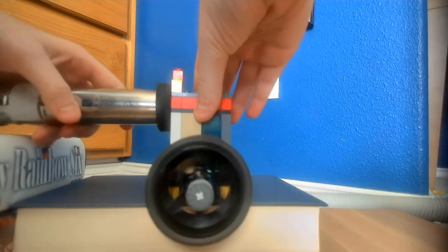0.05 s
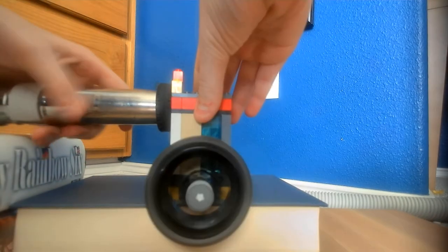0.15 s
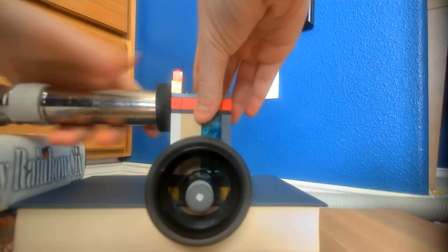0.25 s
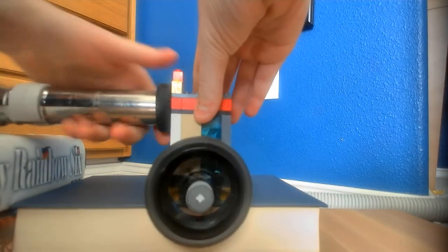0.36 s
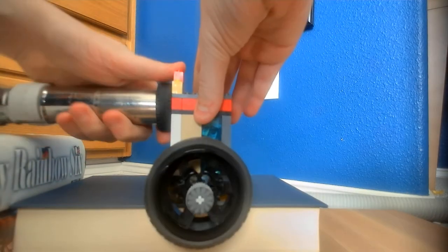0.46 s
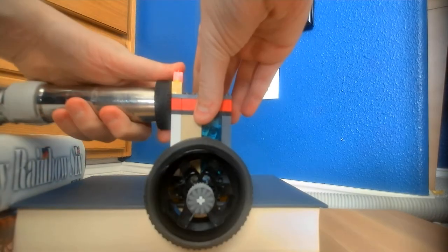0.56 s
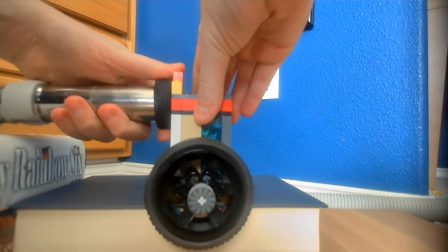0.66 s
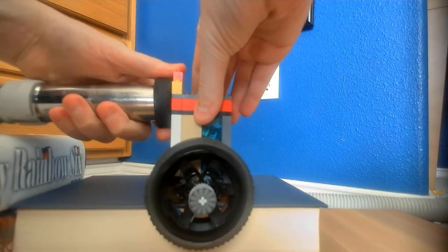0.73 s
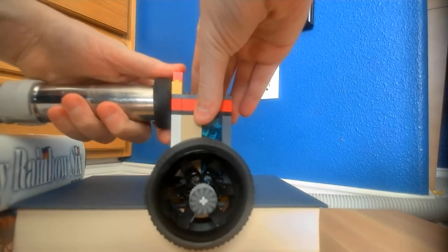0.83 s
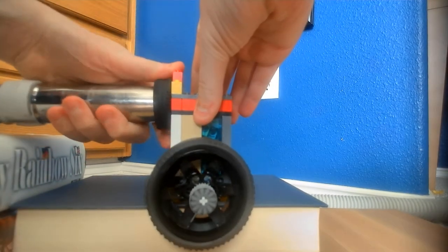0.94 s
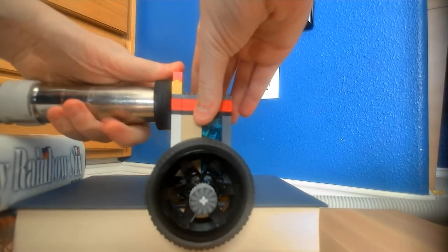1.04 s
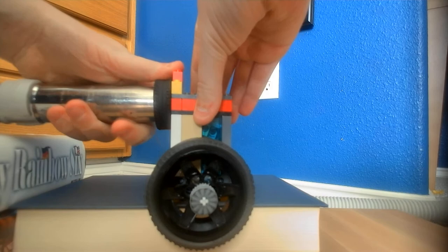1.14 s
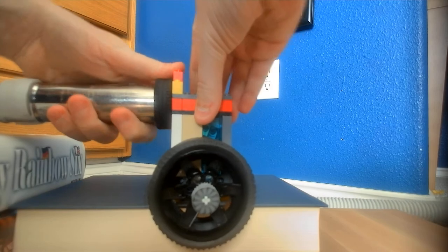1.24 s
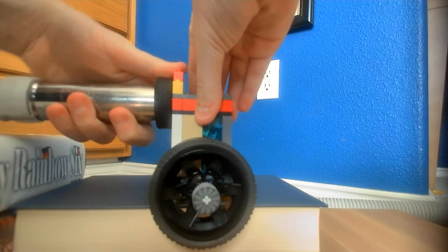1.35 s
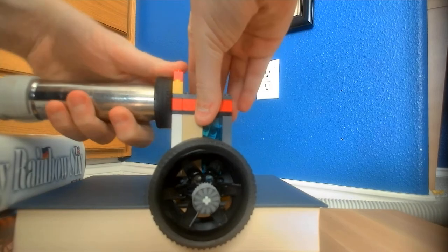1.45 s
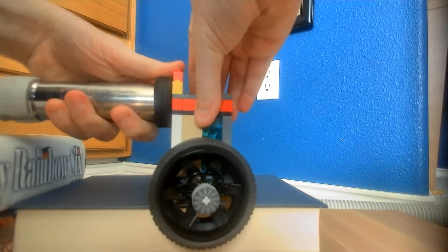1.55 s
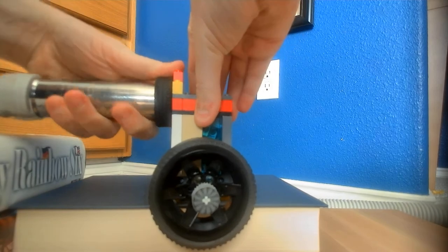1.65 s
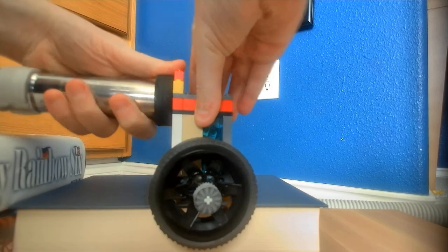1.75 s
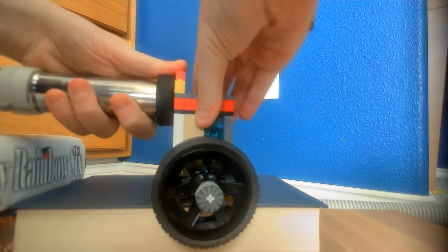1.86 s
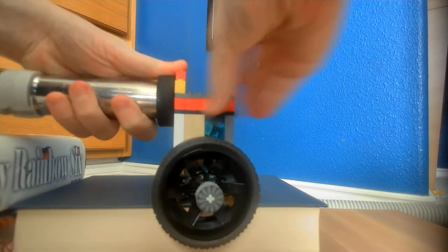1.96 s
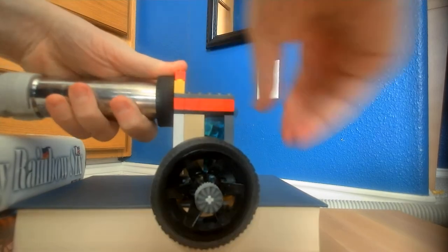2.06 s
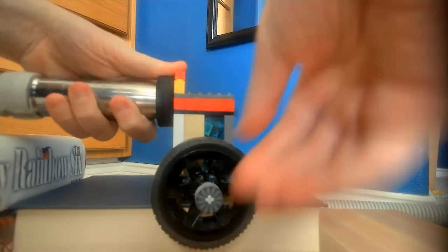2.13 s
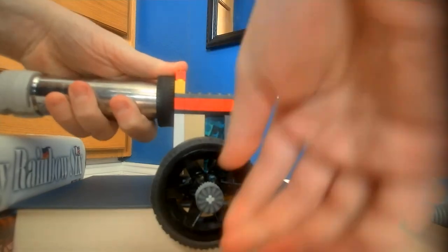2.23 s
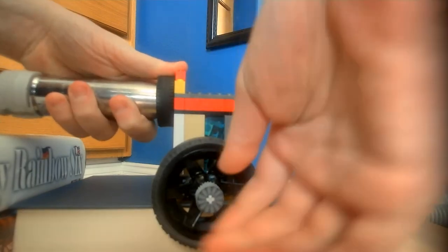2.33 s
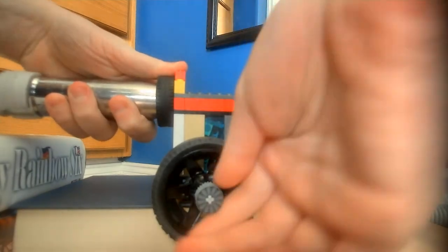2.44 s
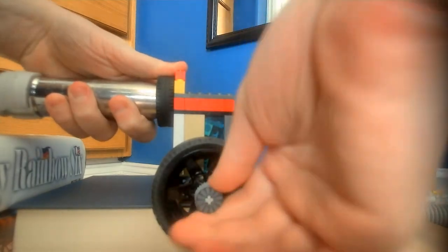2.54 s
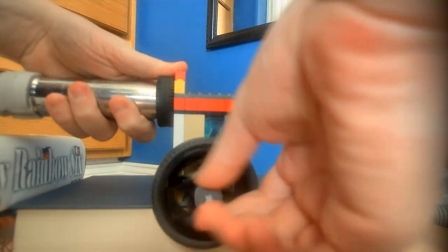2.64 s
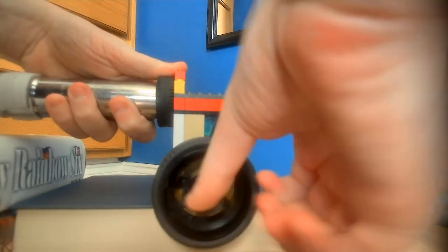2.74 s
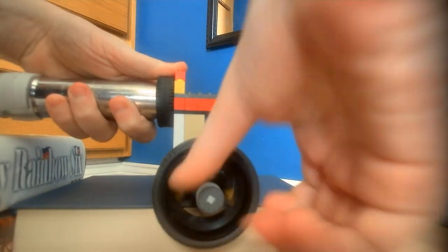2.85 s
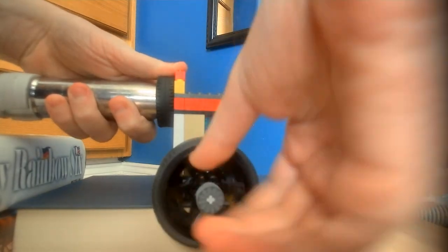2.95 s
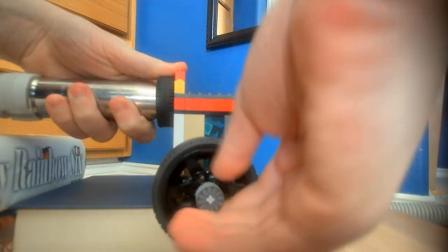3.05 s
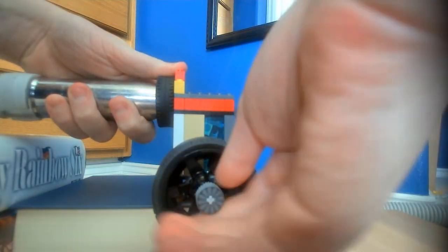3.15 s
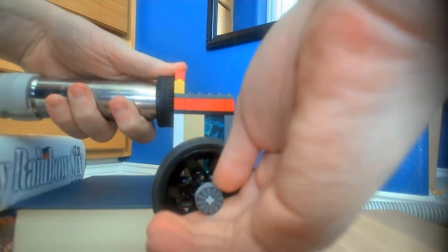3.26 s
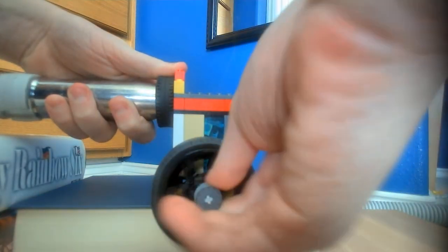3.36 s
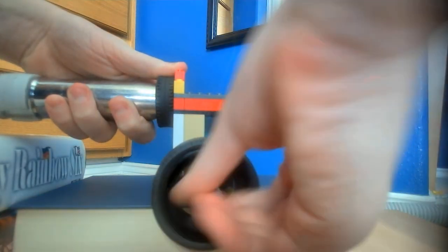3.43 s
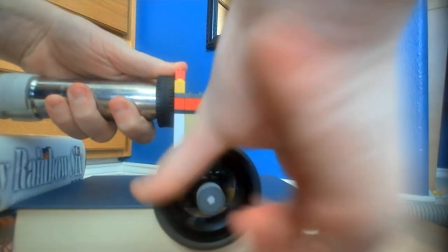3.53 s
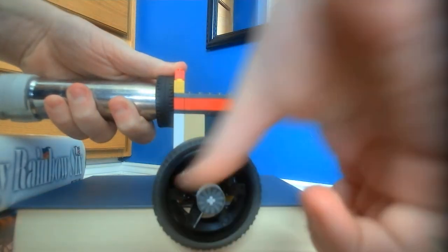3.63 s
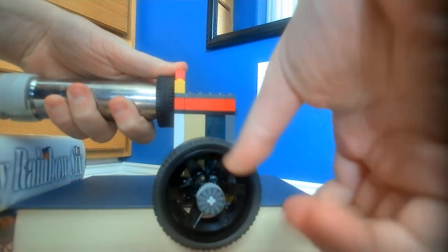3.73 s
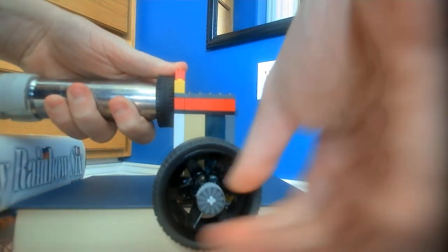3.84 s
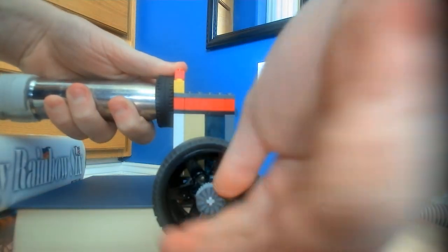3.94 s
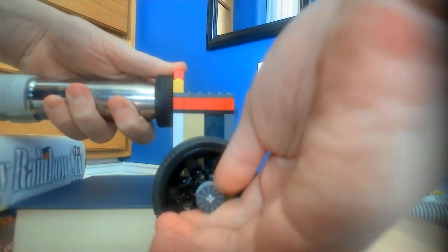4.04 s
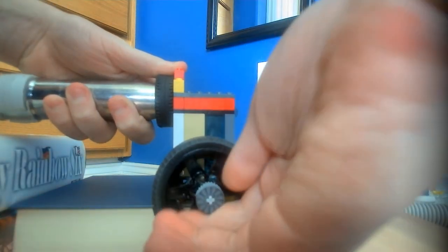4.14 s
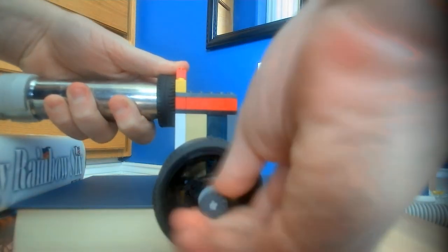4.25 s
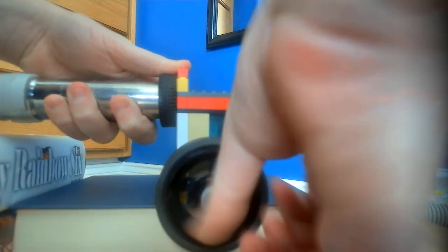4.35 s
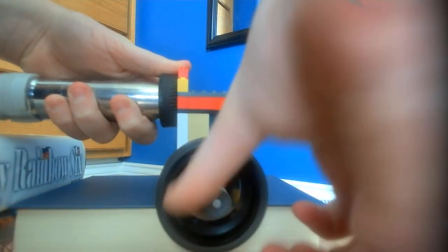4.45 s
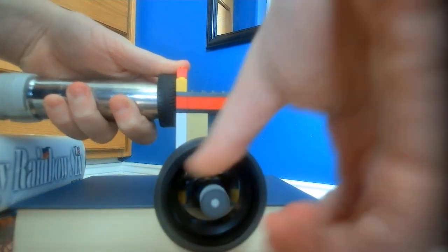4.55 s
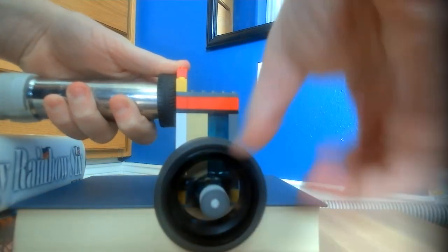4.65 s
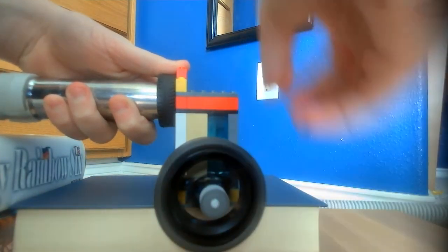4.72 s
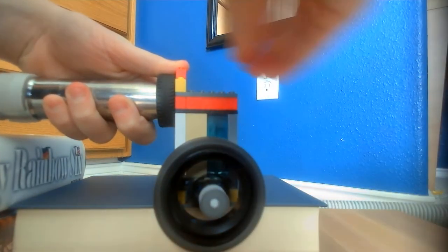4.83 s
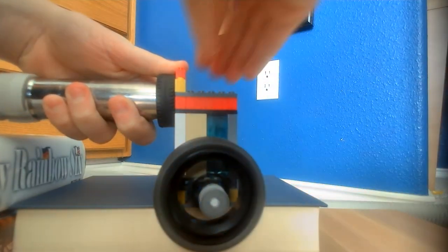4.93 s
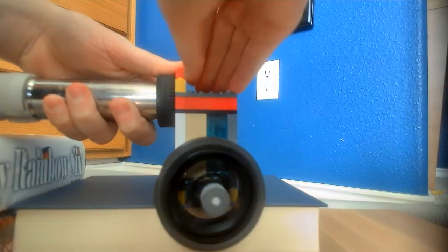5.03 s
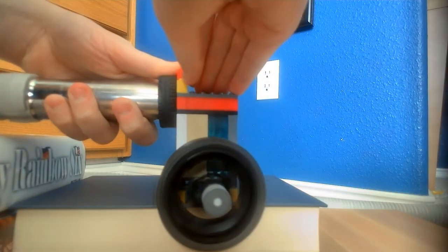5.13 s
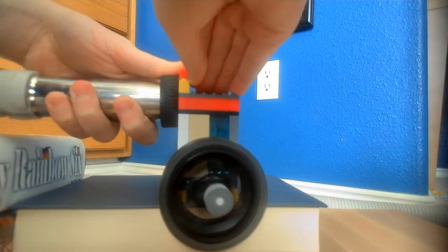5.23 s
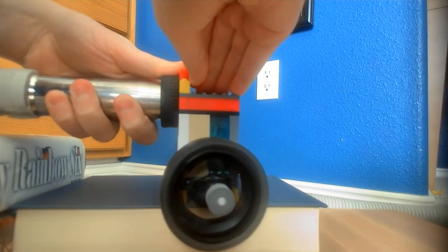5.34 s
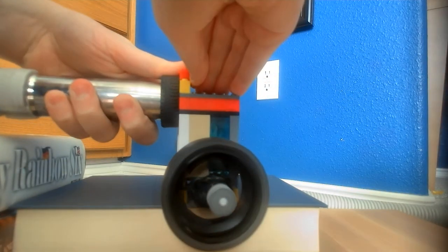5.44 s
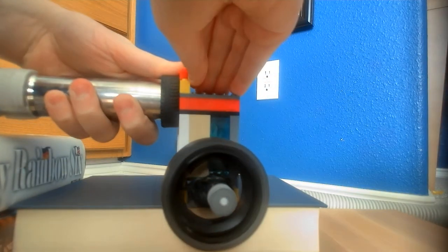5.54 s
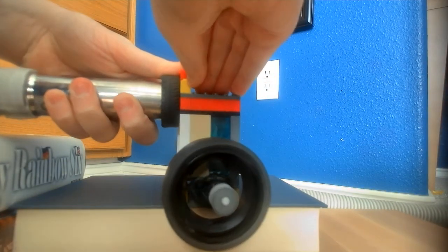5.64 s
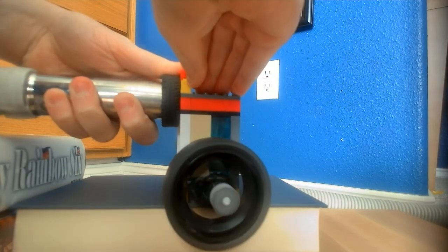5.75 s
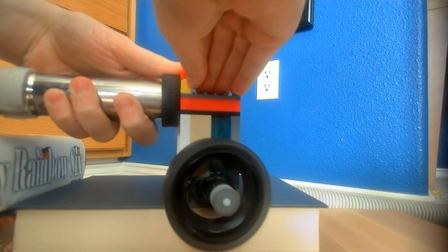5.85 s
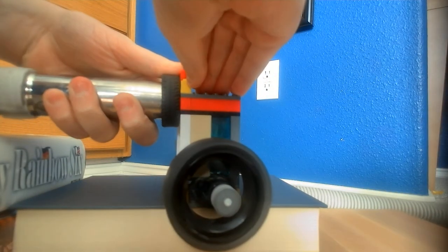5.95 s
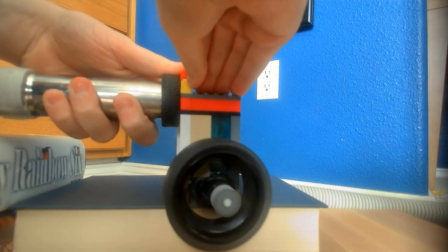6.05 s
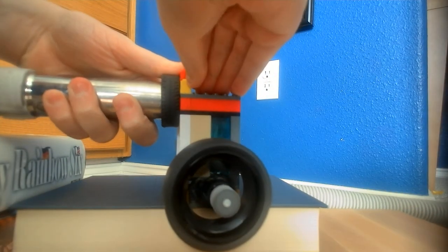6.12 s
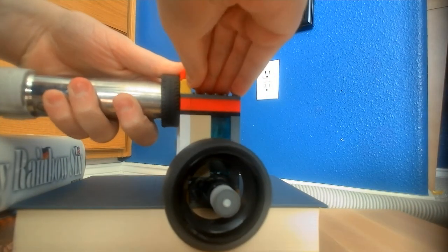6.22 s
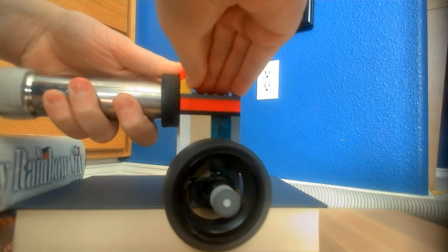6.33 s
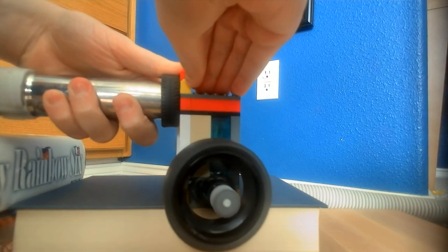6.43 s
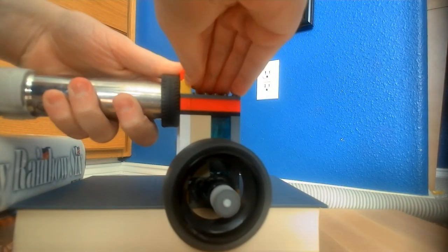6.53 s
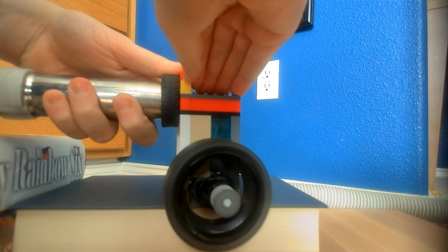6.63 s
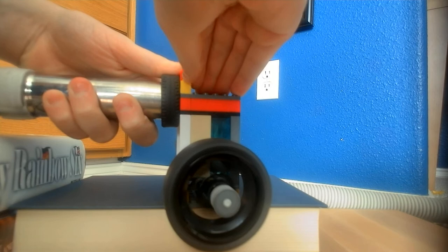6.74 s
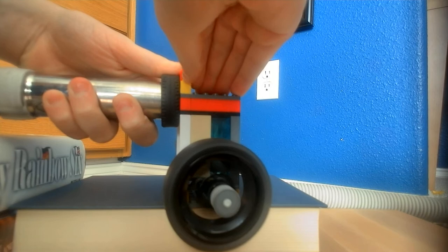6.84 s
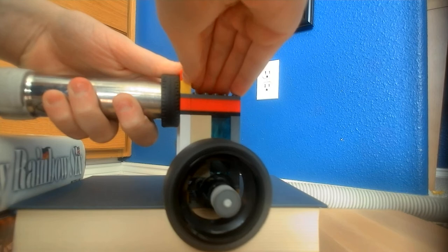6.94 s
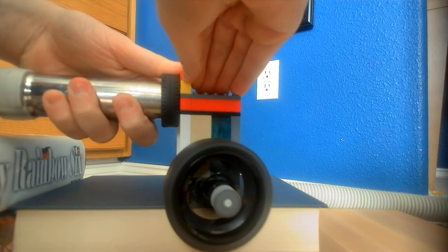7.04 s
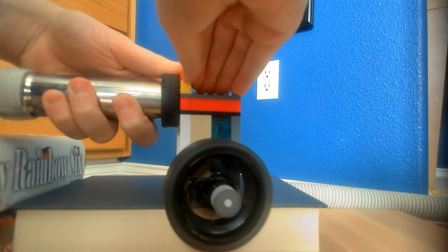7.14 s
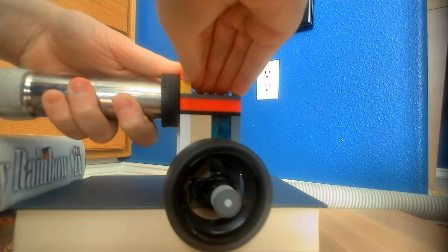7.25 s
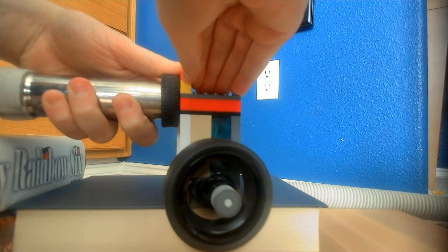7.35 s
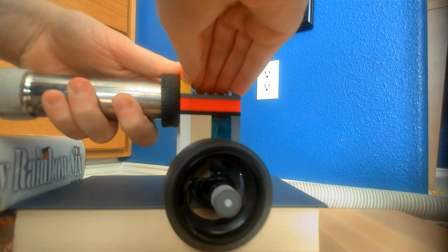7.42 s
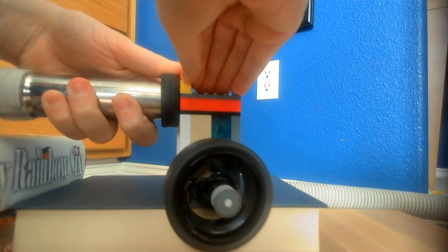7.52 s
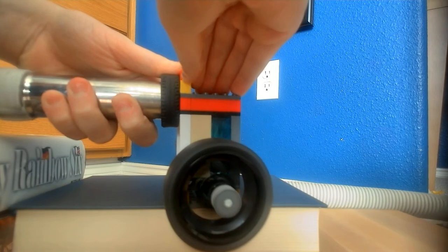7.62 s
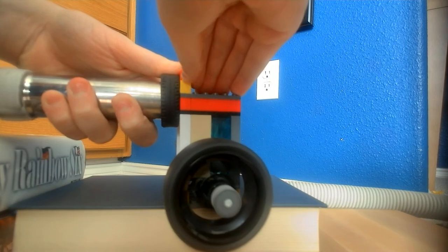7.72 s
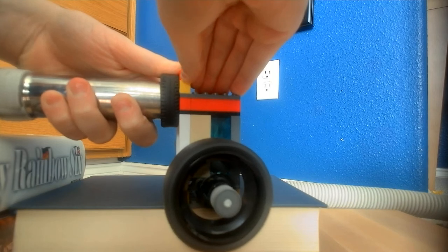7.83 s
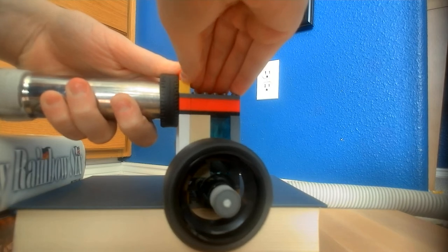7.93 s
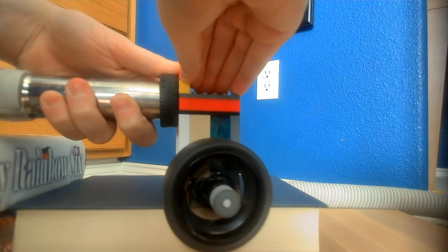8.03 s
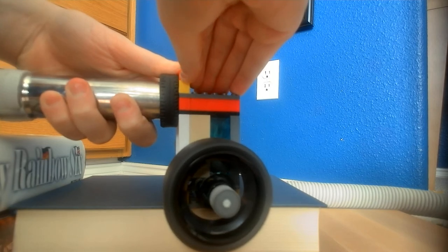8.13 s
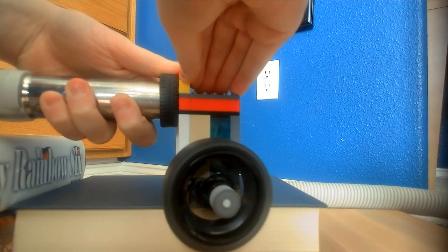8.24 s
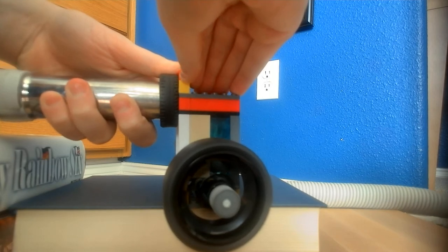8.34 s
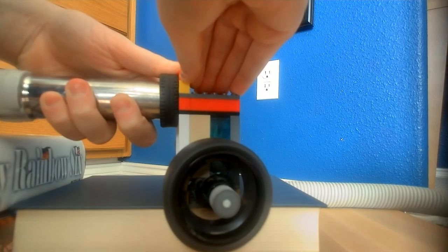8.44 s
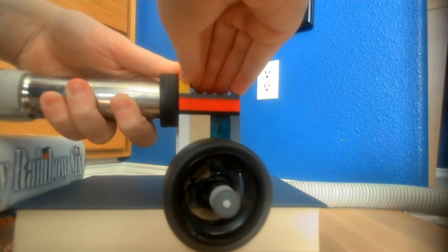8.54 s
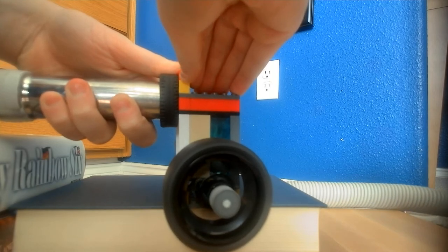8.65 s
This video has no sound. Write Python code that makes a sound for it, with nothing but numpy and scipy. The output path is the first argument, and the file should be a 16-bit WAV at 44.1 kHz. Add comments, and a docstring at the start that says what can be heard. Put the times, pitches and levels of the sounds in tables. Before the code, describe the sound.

From 0 s, vacuum air rushes through a steel tube and valve: a hollow midrange roar under bright, fizzing hiss, close to the microphone. It swells in several short gasps over the first half second, then holds with slight drifting. Around 2.6-2.8 s a hand turning the flywheel makes the air surge, dip and recover. Near 3.4-3.5 s come two more gasps with tiny, very high falling squeaks, the second fainter; the tone then shifts as the valve nearly shuts. At about 4.2 s the toy engine catches, chopping the air roughly fifteen times a second, and climbs quickly to about 28 by 5.1 s. Knocks, low throbbing and a rough axle whirr rise in pitch and loudness, reaching about 43 turns a second by 7.4 s and 46 by 7.7 s. It then holds as a fast, dense, rattling buzz until the end near 8.7 s, slightly overloaded.

```python
"""Air roars and hisses first, swelling under a hand; two tiny squeaks follow, then a toy brick engine catches.
A vacuum hose sucks the engine: noise shaped by steel tube, valve and hose makes the air.
A hand turns the flywheel until it catches; the crank speeds up and its valve chops the air once a turn.
Crank-locked tones make the rocking box and whirring axle, ringing blows make the knocks of loose parts.
A close microphone hears it all, and its overloaded input flattens the peaks."""
import sys
import numpy as np
from scipy import signal
from scipy.fft import rfft, irfft, next_fast_len
from scipy.io import wavfile
from scipy.ndimage import uniform_filter1d

SR = 44100
rng = np.random.default_rng(int(sys.argv[2]) if len(sys.argv) > 2 else 0)


def log_audio(samples):
    """Write samples as a 16-bit WAV file to the path given in sys.argv[1]."""
    # one column per channel
    frames = np.atleast_2d(samples).T
    # limit to full scale, then quantise
    limited = np.clip(frames, -1, 1)
    pcm = np.round(limited * 32767).astype(np.int16)
    wavfile.write(sys.argv[1], SR, pcm)


N = 382788
T = np.arange(N) / SR

# Air colours. Tube roar, its spectrum: freq_hz, relative_density_db
TUBE_ROAR = [(15, -54), (25, -19), (92, -18.5), (129, -17.5), (179, -14.5), (216, -13.5), (368, -14),
             (394, -14), (460, -9), (810, -3.5), (960, -0.5), (1050, 4), (1150, -3.5), (1420, -16),
             (1500, -13.5), (1950, -64), (3300, -120)]
# Resonances of the other air layers: centre_hz, width_hz, relative_level_db
TUBE_OVERTONE = [(1777, 80, 1), (1890, 150, -5), (1690, 130, -5), (2250, 1100, -13)]
VALVE_WHISTLE = [(3300, 420, 0), (3800, 500, -3), (4350, 400, -4)]
VALVE_HISS = [(5740, 1200, 1.5), (5500, 2470, -3)]
VALVE_FIZZ = [(6900, 860, -1.5), (7630, 750, 1), (8460, 800, -2.5), (9280, 930, -2.5)]
HOSE_HISS = [(10650, 600, -9), (11800, 450, -5), (13150, 350, -6), (13950, 350, -2), (15620, 280, 1),
             (12500, 9000, -9)]
# Mix of the air layers, one row each in the order roar, overtone, whistle, hiss, fizz, hose:
# standing_db, nearly_shut_db, top_speed_db, loss_db (an octave slower), hand_share (factor on strokes),
# chop_swing_db (up and down), chop_crest_turn (0-1)
AIR_LAYERS = [(-17.5, -22.5, -15.5, 0, 0.79, 3.5, 0.86), (-24.5, -25, -17, 2, 1.5, 1.8, 0.2),
              (-23.5, -28, -24, 1.1, 0.98, 4.5, 1), (-20, -18.5, -17, 3.5, 1.2, 0.5, 0.86),
              (-18, -17.5, -18, 2, 0.46, 2, 0.2), (-18.5, -20.5, -18.5, 0, 0.17, -0.5, 0.2)]
# Drift of the air while the engine stands: time_s, overtone_and_whistle_db, hiss_db, fizz_db
STANDING_DRIFT = [(0, -0.5, -2, -5), (.5, 1, -0.5, -2), (.7, 0.5, -1, 0), (1, 1.5, 2.5, 1.5),
                  (1.45, -1, -3, -0.5), (1.8, -2, 3, 1), (2.1, -1.5, -1.5, 0), (2.3, 0.5, 1.5, -1),
                  (2.9, -0.5, -1, -0.5), (3.2, -1.5, 0.5, -3.5), (3.6, 1.5, 0, 0.5), (3.85, 0, 2.5, 1),
                  (4.1, 0, 2.5, -2)]
# Hand on hose or wheel, the valve gasps open (+) or shuts (-): centre_s, length_s, swing_db (before hand_share)
HAND_STROKES = [(.07, 0.26, 6), (0.164, .07, 0), (0.26, 0.19, 3.5), (0.41, 0.16, 4), (2.64, 0.16, 8),
                (2.742, 0.036, -6), (2.788, 0.067, 1.5), (3.385, 0.15, 8.5), (3.45, 0.033, -4),
                (3.5, 0.074, 7), (4.227, 0.063, -5)]
NEARLY_SHUT_S, SETTLE_S = 3.56, 0.05  # the wheel comes to rest with the valve almost closed
# Squeaks of the valve as the hand turns the wheel: start_s, length_s, start_hz, end_hz, level_db
VALVE_SQUEAKS = [(3.392, 0.028, 8800, 8370, -5), (3.51, .03, 9000, 8300, -14)]

# Crank speed once the engine catches: time_s, speed_turns_per_s
CRANK_SPEED = [(4.22, 14.96), (4.8, 23.96), (4.95, 27.47), (5.11, 28.18), (5.45, 32.19), (6.27, 35.7),
               (6.97, 42.09), (7.42, 43.08), (7.74, 46.21), (8.68, 46.03)]
START_TURN = -.74  # crank angle in turns as the engine catches
TOP_SPEED = 46  # turns a second, the reference for every loss an octave slower
# Slow rocking and faster shaking from the unbalanced crank: crank_order, relative_level_db, crest_turn (0-1)
ROCK_ORDERS = [(1, -14, 0.35), (2, -3, 0.14), (3, -3.5, 0.23)]
SHAKE_ORDERS = [(4, -3.5, 0.2), (5, -4.5, 0.14), (6, 0.5, .17)]
ROCK_DB, ROCK_LOSS_DB = -15, 14.5  # at top speed ahead of the box, lost an octave slower
SHAKE_DB, SHAKE_LOSS_DB = -22, 15
# Resonances of the box under the engine: centre_hz, width_hz, gain_db
BOX_RESONANCES = [(78, 35, -2.5), (111.4, 19.5, -0.8), (35, 40, -2), (140, 200, -8.5)]
# Axle whirr, each order loudest near one speed: crank_order, level_db, crest_turn (0-1), best_speed_turns_per_s
AXLE_WHIRR = [(7, -27, .3, 46), (14, -16, 0.2, 58), (18.97, -23.5, .32, 35), (19.1, -23.5, .32, 46),
              (19.94, -20.5, .29, 32.9), (20.97, -27, .25, 31), (21.87, -25.5, .2, 28.3),
              (25, -17, 0.56, 41), (26.05, -24, 0.4, 42), (26, -24, .54, 46), (16, -32, .3, 46),
              (28.97, -20, .42, 33), (29, -21.5, .42, 46), (30.2, -25, .4, 25.3)]
WHIRR_FADE_DB = 2.2  # lost for each turn a second away from that speed

# Ringing modes of box, frame and bricks: pitch_hz, t60_s
BODY_MODES = [(335, 0.026), (544, 0.025), (737, 0.04), (1094, 0.035), (1781, 0.037)]
# The two crank speeds that the knock patterns belong to, climbing and at the top: speed_turns_per_s
KNOCK_SPEEDS = [43, 45.8]
# Five contacts a turn, one pattern for each knock speed: contact_turn (0-1), then relative_level_db on each mode
KNOCK_CONTACTS = [
    [(.14, -4, -36, -6, -19, -32), (.26, -58, -0.5, -11, -22, -9), (.4, -10.5, -34, -13, -9.5, -12),
     (.538, -1, -9, -17, -14, -20.5), (.672, -27, -12.5, -12, -6.5, -18)],
    [(.152, -4.5, -32, -4, -18, -18), (.208, -39, 0.5, -37, -8.5, -9.5), (.36, -10, -36, -9.5, -0.5, -20),
     (.52, -14.5, -39, -15.5, -34, -14), (.604, -25, -4.5, -43, -34, -34)],
]
# Extra level each contact loses at lower speed: loss_db (an octave slower), one per contact
CONTACT_LOSS_DB = [28, 29, 0.1, 7.4, 8.1]
FORCE_DB, FORCE_LOSS_DB = 1.5, 11  # all knocks: gain at top speed, lost an octave slower

# Resonances of the running valve as it opens and as it closes: centre_hz, width_hz, relative_level_db
OPENING_VALVE = [(3735, 560, -3), (4715, 196, 4.5), (5200, 520, -1), (5970, 720, -0.5)]
CLOSING_VALVE = [(6580, 480, 2), (7110, 810, -1), (7770, 830, -1.2), (8570, 380, 0.16)]
OPENING_DB, OPENING_TURN, CLOSING_DB, CLOSING_TURN = -20, 0.907, -18.5, 1.01  # level and crest in turns

OVERLOAD_GAIN_DB, CEILING = 4, .67  # drive into the input, amplitude that peaks flatten towards
TOP_HZ = 15725  # band limit


def amp(db):
    """Gain of a level in dB."""
    return 10 ** (np.asarray(db) / 20)


def unit(x):
    """x at rms 1."""
    return x / np.sqrt(np.mean(x ** 2) + 1e-20)


def curves(rows):
    """One value per sample for each column after the time."""
    s, *cols = np.transpose(rows)
    return np.array([np.interp(T, s, c) for c in cols])


def filtered(x, response):
    """x times a response of frequency."""
    m = next_fast_len(N + 8192)
    spectrum = rfft(x, m) * response(np.fft.rfftfreq(m, 1 / SR))
    return irfft(spectrum, m)[..., :N]


def resonances(peaks):
    """Gain of a few resonances with steep skirts, added in power."""
    def gain(f):
        powers = (amp(2 * db) / (1 + (2 * (f - c) / w) ** 2) ** 2 for c, w, db in peaks)
        return np.sqrt(sum(powers))
    return gain


def turbulence(response, patchy_db):
    """Turbulent air: noise of rms 1 whose colour drifts in patches of time and frequency."""
    z = signal.stft(rng.standard_normal(N + 512), nperseg=512)[2]
    field = uniform_filter1d(rng.standard_normal(z.shape), 5, 0)  # smooth over frequency
    field = uniform_filter1d(field, 30, 1)  # smooth over time
    noise = signal.istft(z * amp(patchy_db * unit(field)), nperseg=512)[1][:N]
    return unit(filtered(noise, response))


def slower():
    """Octaves below top speed."""
    return np.log2(TOP_SPEED / curves(CRANK_SPEED)[0])


def hand_db():
    """Level swing of the air as the hand's strokes open and shut the valve."""
    swing = 0
    for centre, length, db in HAND_STROKES:
        progress = np.clip((T - centre) / length + .5, 0, 1)
        swing = swing + db * np.sin(np.pi * progress) ** 2
    return swing


def air(turns, running):
    """Turbulence in tube, valve and hose; the valve opens and shuts once a turn."""
    hz, db = np.transpose(TUBE_ROAR)
    roar = lambda f: amp(np.interp(np.log(f + 1), np.log(hz + 1), db))
    peaks = (TUBE_OVERTONE, VALVE_WHISTLE, VALVE_HISS, VALVE_FIZZ, HOSE_HISS)
    colours = [roar] + [resonances(p) for p in peaks]
    shut = np.clip((T - NEARLY_SHUT_S) / SETTLE_S, 0, 1)
    tone_db, hiss_db, fizz_db = curves(STANDING_DRIFT)
    drifts = (0, tone_db, tone_db, hiss_db, fizz_db, 0)
    total = np.zeros(N)
    for layer, colour, drift_db in zip(AIR_LAYERS, colours, drifts):
        stand_db, shut_db, top_db, loss_db, share, swing_db, crest = layer
        still_db = stand_db + shut * (shut_db - stand_db) + drift_db + share * hand_db()
        chop_db = swing_db * np.cos(2 * np.pi * (turns - crest))
        moving_db = top_db - loss_db * slower() + chop_db
        level_db = still_db + running * (moving_db - still_db)
        total += amp(level_db) * turbulence(colour, patchy_db=1.77)
    return total


def squeaks():
    """The valve squeaks as it gasps open: short falling tones with a soft start and end."""
    total = np.zeros(N)
    for s, length, from_hz, to_hz, db in VALVE_SQUEAKS:
        u = np.clip((T - s) / length, 0, 1)
        cycles = length * (from_hz * u + (to_hz - from_hz) * u ** 2 / 2)
        total += amp(db) * np.sin(np.pi * u) * np.sin(2 * np.pi * cycles)
    return total


def crank():
    """Crank angle in turns, integrated from speed once the engine catches, and a 0-1 fade into running."""
    running = np.clip((T - CRANK_SPEED[0][0]) / 0.03, 0, 1)
    turned = np.cumsum(curves(CRANK_SPEED)[0] * (running > 0)) / SR
    return START_TURN + turned, running


def orders(turns, table, level_db):
    """Tones at multiples of the crank's speed, locked to its angle."""
    tones = sum(amp(db) * np.cos(2 * np.pi * k * (turns - crest)) for k, db, crest in table)
    return amp(level_db) * unit(tones)


def rocking(turns):
    """The unbalanced crank rocks the box, whose resonances colour the low orders."""
    push = orders(turns, ROCK_ORDERS, ROCK_DB - ROCK_LOSS_DB * slower())
    return filtered(push, resonances(BOX_RESONANCES))


def shaking(turns):
    """The unbalanced crank shakes the box at higher orders, weaker at lower speed."""
    return orders(turns, SHAKE_ORDERS, SHAKE_DB - SHAKE_LOSS_DB * slower())


def whirr(turns):
    """High crank orders of the rough axle, each singing around its own speed."""
    speed = curves(CRANK_SPEED)[0]
    total = np.zeros(N)
    for k, db, crest, best in AXLE_WHIRR:
        level_db = db - WHIRR_FADE_DB * abs(speed - best)
        total += amp(level_db) * np.cos(2 * np.pi * k * (turns - crest))
    return total


def knocks(turns):
    """Slack in piston and crank closes at set angles; each contact varies a little in time and force."""
    t = np.arange(SR // 10) / SR
    whole = np.arange(int(turns[-1]) + 1)
    speed = curves(CRANK_SPEED)[0][np.minimum(np.searchsorted(turns, whole), N - 1)]
    # blend of the two patterns in each turn
    share = np.array([np.interp(speed, KNOCK_SPEEDS, row) for row in np.eye(len(KNOCK_SPEEDS))])
    blows = np.zeros((len(BODY_MODES), N + 1))
    for contact, loss_db in zip(np.transpose(KNOCK_CONTACTS, (1, 2, 0)), CONTACT_LOSS_DB):
        chance = rng.standard_normal((len(whole), 1 + len(BODY_MODES)))
        angle = whole + contact[0] @ share + .0012 * chance[:, 0]  # jitter in turns
        when = np.searchsorted(turns, angle)
        varied_db = 1.1 * chance[:, 1:].T - loss_db * np.log2(TOP_SPEED / speed)
        blows[:, when] += amp(contact[1:]) @ share * amp(varied_db)
    rings = [amp(-60 * t / t60) * np.sin(2 * np.pi * hz * t) for hz, t60 in BODY_MODES]
    rings = rings * (1 - np.exp(-t / .0008))  # plastic meets softly
    force = amp(FORCE_DB - FORCE_LOSS_DB * slower())
    return signal.fftconvolve(blows[:, :N] * force, rings, axes=1)[:, :N].sum(axis=0)


def intake(turns, colour, crest, level_db):
    """Air rushes through the valve for about two thirds of each turn."""
    opening = np.clip(0.47 + np.cos(2 * np.pi * (turns - crest)), 0, 1)
    rush = opening * turbulence(resonances(colour), patchy_db=1.8)
    return amp(level_db) * unit(rush)


def scene():
    """Engine and air reach a single microphone, alike on both channels."""
    turns, running = crank()
    tones = rocking(turns) + shaking(turns) + whirr(turns)
    opening = intake(turns, OPENING_VALVE, OPENING_TURN, OPENING_DB)
    closing = intake(turns, CLOSING_VALVE, CLOSING_TURN, CLOSING_DB)
    engine = tones + knocks(turns) + opening + closing
    sound = air(turns, running) + running * engine + squeaks()
    return np.array([sound, sound])


def record(dry):
    """The overloaded input flattens the peaks; nothing is kept above the band limit."""
    hot = dry * amp(OVERLOAD_GAIN_DB)
    flat = hot / (1 + np.abs(hot / CEILING) ** 7) ** (1 / 7)
    return filtered(flat, lambda hz: hz < TOP_HZ)


dry = scene()
out = record(dry)
log_audio(out)
```